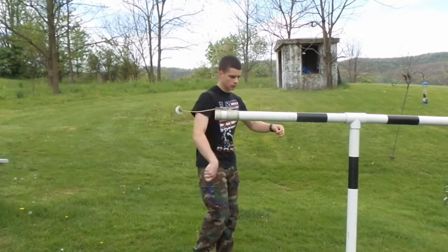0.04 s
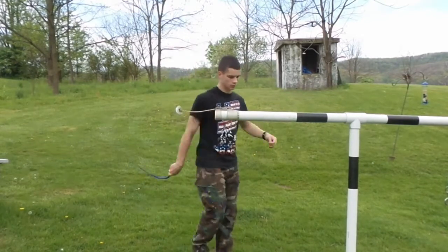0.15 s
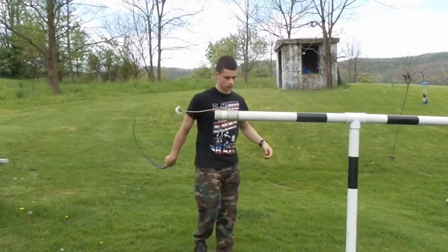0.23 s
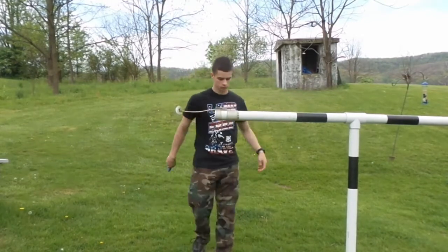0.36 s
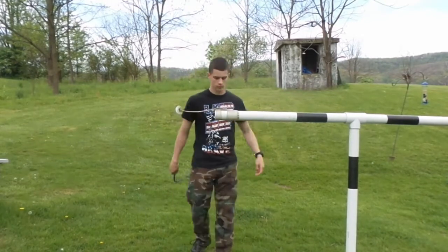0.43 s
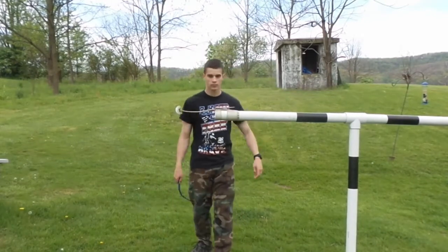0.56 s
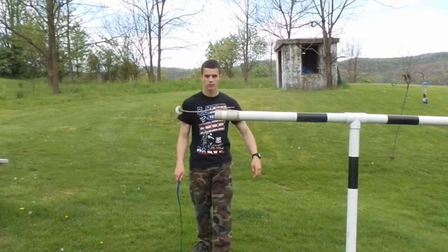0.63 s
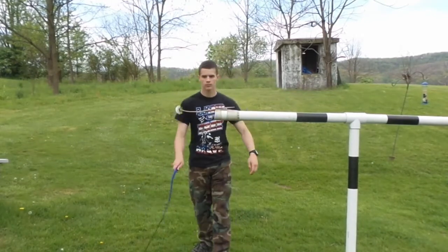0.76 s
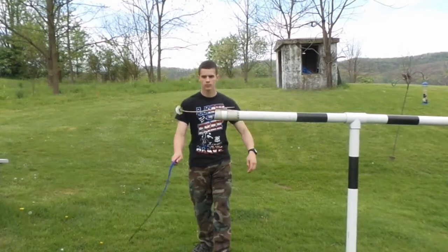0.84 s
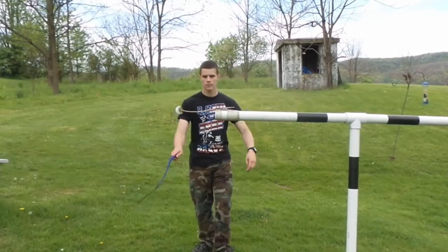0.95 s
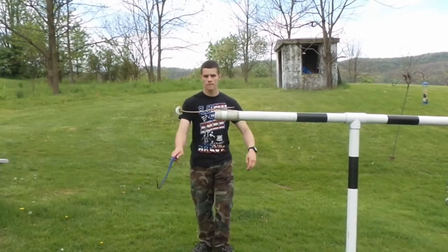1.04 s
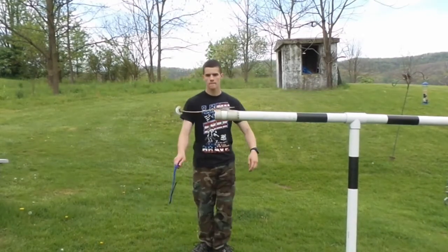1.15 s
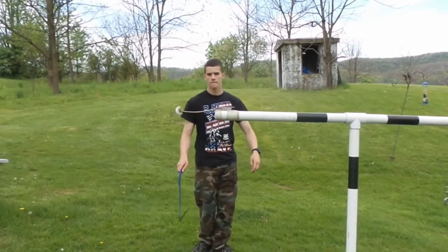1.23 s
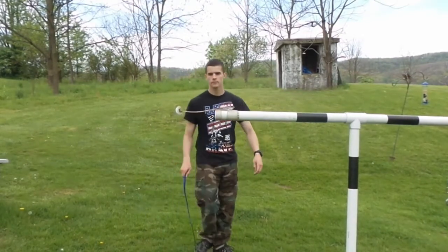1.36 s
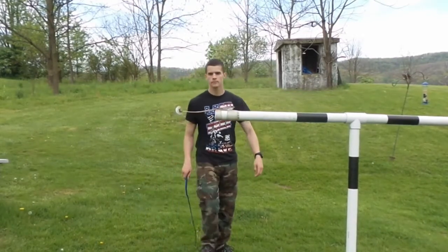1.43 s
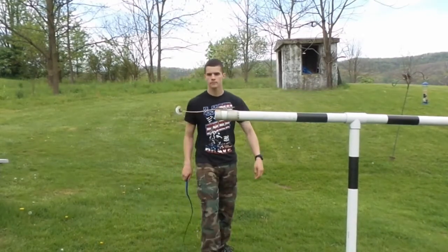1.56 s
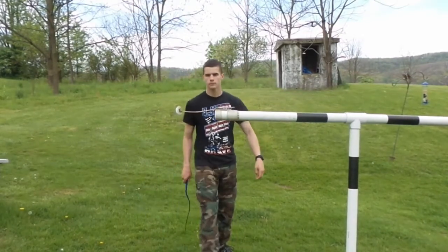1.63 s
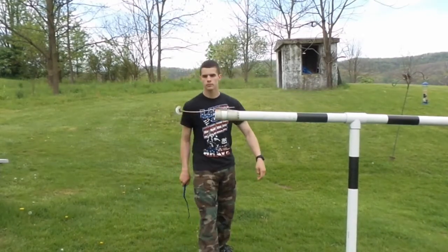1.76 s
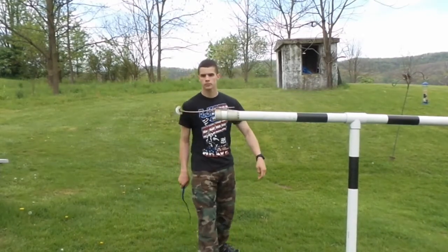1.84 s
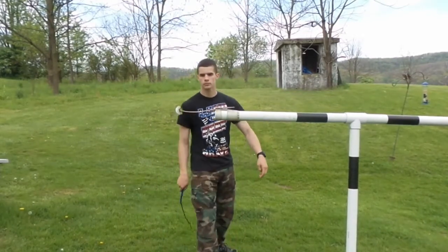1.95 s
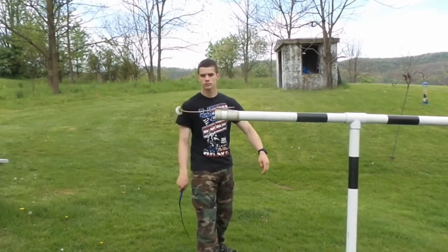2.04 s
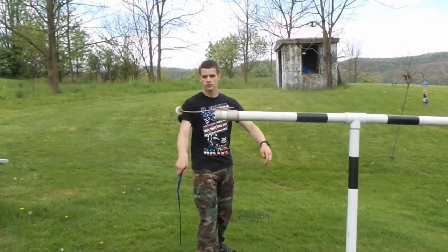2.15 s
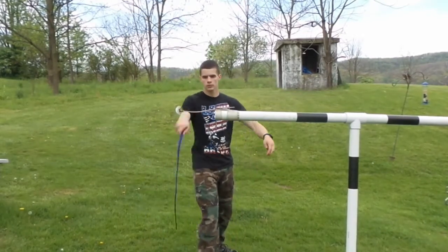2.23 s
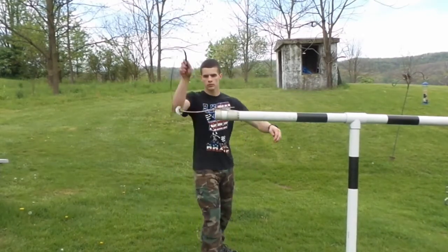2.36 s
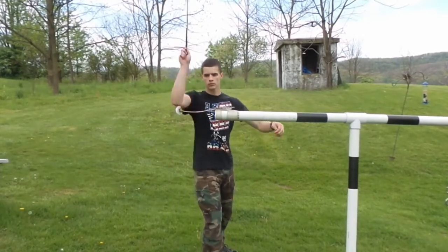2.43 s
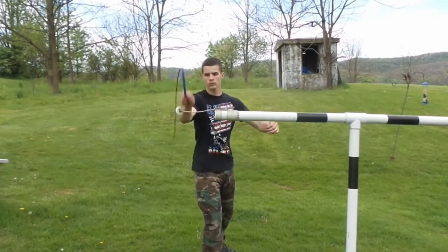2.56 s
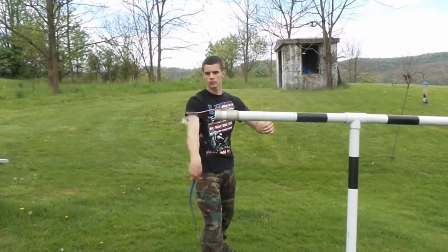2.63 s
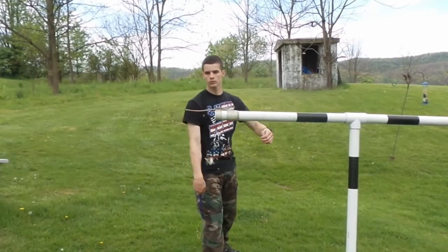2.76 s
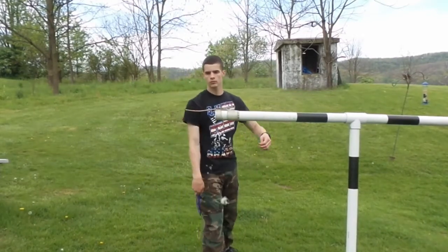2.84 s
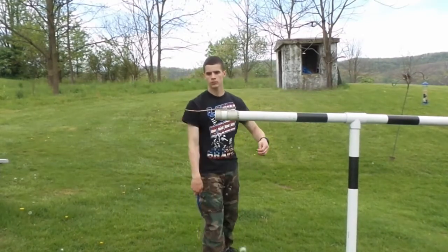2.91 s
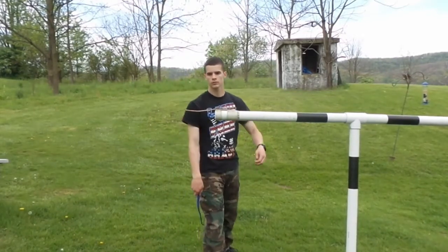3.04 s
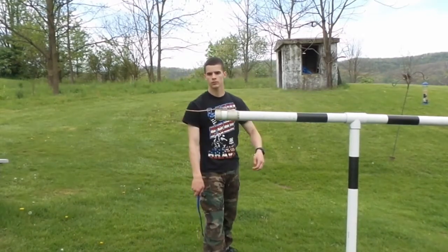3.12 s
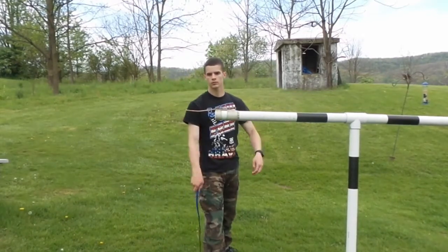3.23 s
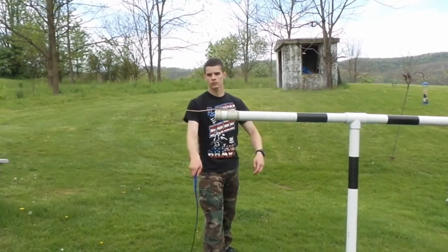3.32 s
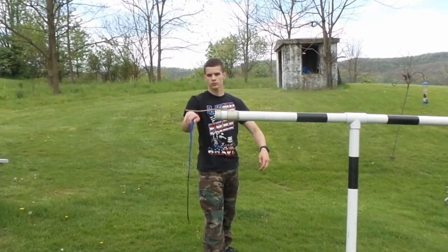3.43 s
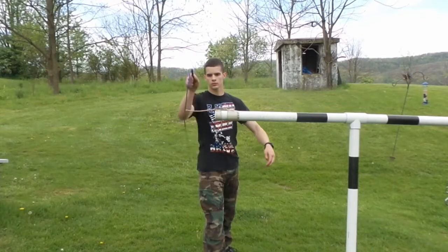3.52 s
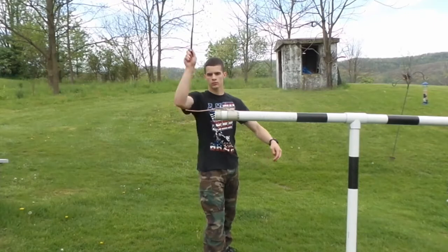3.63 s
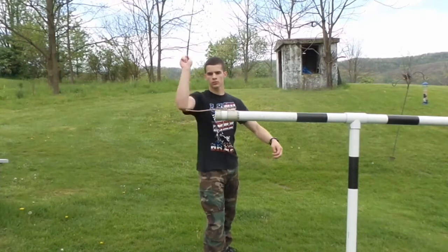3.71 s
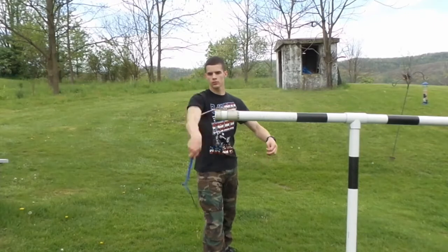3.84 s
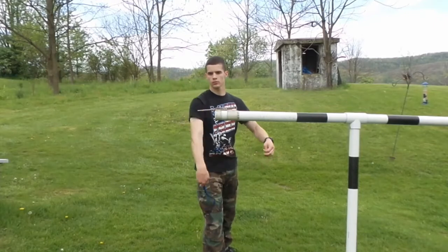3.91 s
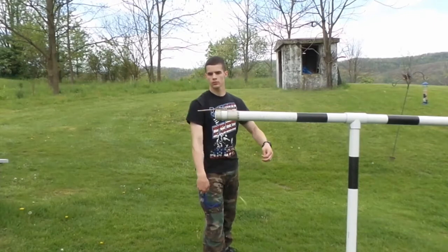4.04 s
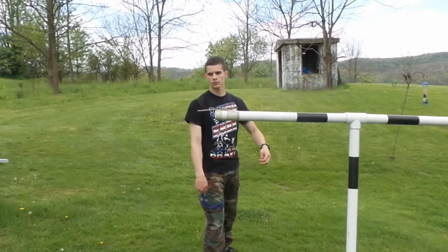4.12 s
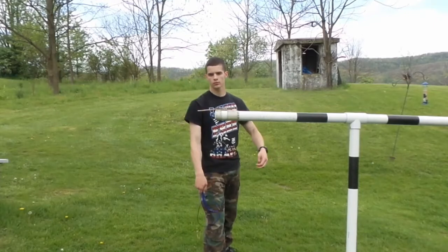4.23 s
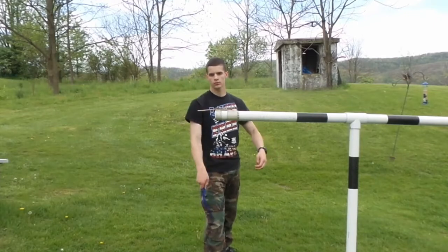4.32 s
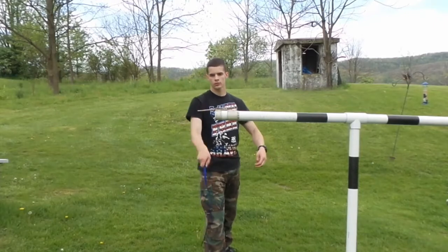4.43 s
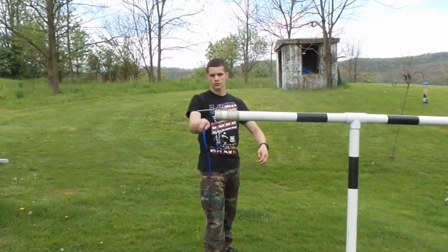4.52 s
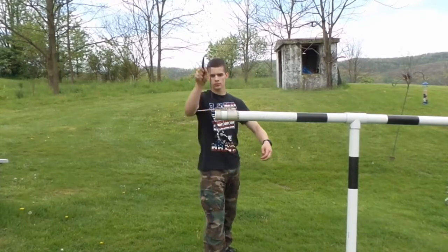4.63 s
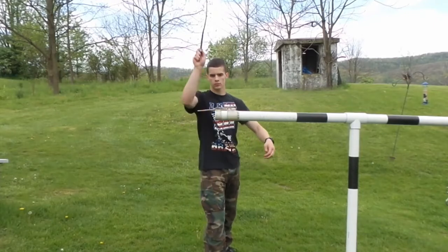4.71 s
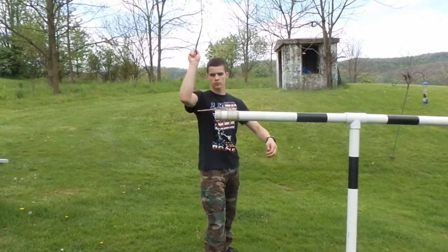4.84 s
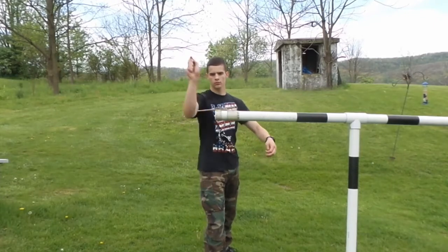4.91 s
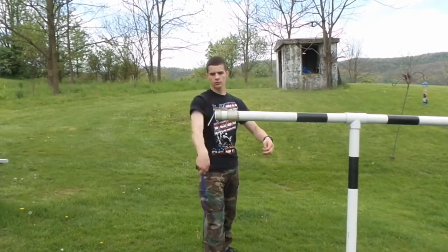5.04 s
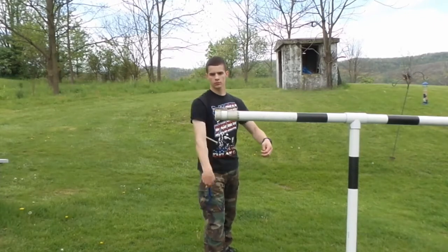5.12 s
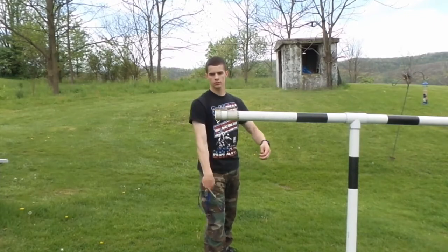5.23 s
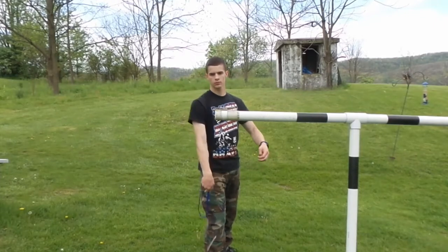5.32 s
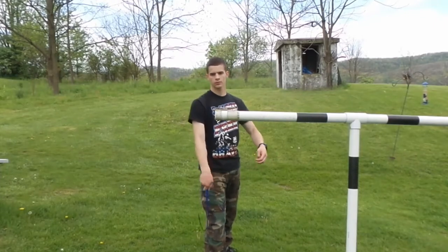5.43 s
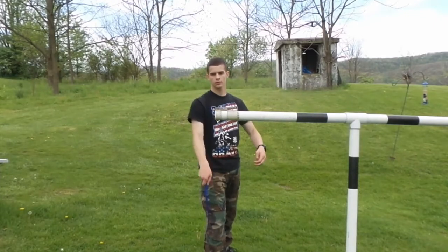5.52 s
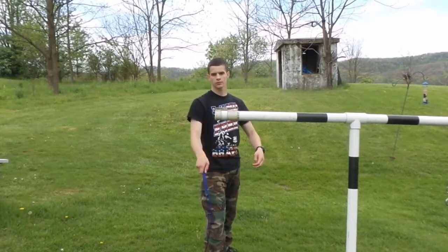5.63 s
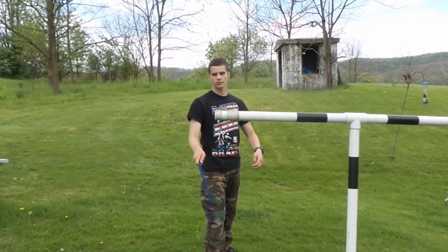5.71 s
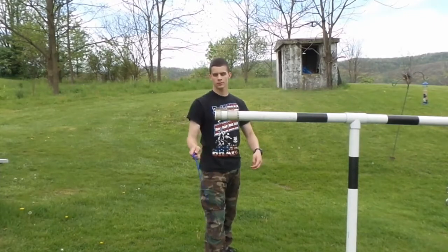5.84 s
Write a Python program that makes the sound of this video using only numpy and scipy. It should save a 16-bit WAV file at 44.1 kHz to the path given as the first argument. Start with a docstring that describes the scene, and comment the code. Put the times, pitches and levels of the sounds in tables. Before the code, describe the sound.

Four very loud, needle-sharp whip cracks in open air, heard by a nearby camera microphone that clips. The first comes immediately after a wavering whistle; the others arrive in the second half, evenly spaced, with short airy rushes before them. Each sprays crisp, hissing reflections from grass and a wall, dying within a fraction of a second. Between them there is near silence, a light breeze, muffled puffs and a few faint ticks.

```python
"""A whistling swish over a faint breeze leads to the first of four cracks of a small cord whip on a lawn.
Cord and tip shed vortices that whistle or rush; then the tip sends out a shock, an N-shaped pressure wave,
which overloads the microphone. Grass, near objects, a wall and a line of trees scatter delayed noise.
The breeze is coloured noise of varying strength; puffs of air thud on the microphone, and faint dry
ticks are noise bursts through a resonance."""
import sys
import numpy as np
from scipy import signal
from scipy.fft import rfft, irfft, next_fast_len
from scipy.io import wavfile
from scipy.ndimage import map_coordinates

SR = 44100
rng = np.random.default_rng(int(sys.argv[2]) if len(sys.argv) > 2 else 0)


def generate_wav(sig):
    """Save sig (samples, or channels by samples) to the path in sys.argv[1] as 16-bit PCM at SR."""
    pcm = np.round(np.clip(np.atleast_2d(sig).T, -1, 1) * 32767).astype(np.int16)
    wavfile.write(sys.argv[1], SR, pcm)


N = 258801

# The cracks: (time [s], shock level [dB], shock length [ms], treble ring level [dB], lawn echo level [dB],
# wall echo level [dB], wall decay t60 [s], trees' echo level [dB])
CRACKS = [(0.1946, -5.5, 0.12, -5.5, -20.5, -18.5, .15, -39), (2.762, 0.5, 0.166, -2, -24, -20, 0.22, -43),
          (4.0002, 2, 0.22, 2.8, -28, -22.5, 0.15, -49.5), (5.157, 2.8, 0.16, -0.2, -28, -22.5, .17, -48.5)]
# Colour of the lawn's echo: (frequency [Hz], relative density [dB per Hz])
LAWN_COLOUR = [(100, -38), (300, -22), (800, -8.5), (1600, -10), (4000, -7), (7000, -1.5), (12000, 0.5),
               (16000, -4.5)]
# Colour of the wall's echo: (frequency [Hz], relative density [dB per Hz])
WALL_COLOUR = [(100, -38.5), (300, -24), (700, -6), (1600, -6), (3500, -3), (6000, 0.5), (12500, 1),
               (16000, -4)]


def amp(db):
    """Level law: decibels to an amplitude factor, 20 dB to a factor of ten."""
    return 10 ** (np.asarray(db) / 20)


def unit(x):
    """Normalisation of power: x scaled to rms 1."""
    return x / np.sqrt(np.mean(x ** 2) + 1e-20)


def clock(origin_s=0):
    """Uniform sampling: the time [s] since the origin at every sample of the scene."""
    return np.arange(N) / SR - origin_s


def along(points, hz):
    """Logarithmic frequency scale: interpolates (frequency [Hz], value) points along it."""
    point_hz, values = np.transpose(points)
    return np.interp(np.log(hz + 1), np.log(point_hz + 1), values)


def curves(rows):
    """Piecewise linear variation: one curve over the scene for each column after the time."""
    times, *columns = np.transpose(rows)
    return [np.interp(clock(), times, column) for column in columns]


def fade(t, t60):
    """Exponential decay: 1 up to t = 0, then 60 dB down after each t60 [s]."""
    return np.exp(-np.log(1000) * np.maximum(t, 0) / t60)


def swell(t, rise, fall):
    """Exponential growth up to t = 0 and exponential decay after it, with time constants [s]."""
    return np.exp(np.minimum(t / rise, -t / fall))


def filtered(x, response):
    """Linear filtering: the spectrum of x times a response of frequency."""
    size = next_fast_len(len(x) + 8192)  # padded against wrap-around
    spectrum = rfft(x, size) * response(np.fft.rfftfreq(size, 1 / SR))
    return irfft(spectrum, size)[:len(x)]


def noise(colour, size=N):
    """Spectral shaping: white noise given a (frequency [Hz], density [dB per Hz]) colour, at rms 1."""
    return unit(filtered(rng.standard_normal(size), lambda hz: amp(along(colour, hz))))


def air(corner_hz, size, order=1):
    """Turbulence noise of rms 1: thin in the deep bass and falling above a corner."""
    def response(hz):
        bass_cut = hz / np.hypot(hz, 250)
        return bass_cut / np.hypot(hz / corner_hz, 1) ** order

    return unit(filtered(rng.standard_normal(size), response))


def wobble(rate):
    """Band-limited fluctuation: a smooth random curve with rate knots a second."""
    knots = rng.standard_normal(int(N * rate / SR) + 4)
    return map_coordinates(knots, [clock() * rate])


def ping(t, hz, t60):
    """Damped resonance: a decaying cosine that starts at full pressure."""
    return np.cos(2 * np.pi * hz * t) * fade(t, t60)


def n_wave(ms):
    """Weak-shock N-wave: pressure jumps up, falls through zero and jumps back."""
    samples = SR * ms / 1000
    u = (np.arange(SR // 100) - 1) / samples  # 0 at the front shock, 1 at the rear
    front = np.clip(u * samples + 1, 0, 1)
    rear = np.clip((1 - u) * samples + 1, 0, 1)
    return (1 - 2 * u) * front * rear / (1 + 1 / samples)


def crackle(colour, share):
    """Sparse scattering: a second of noise of rms 1, a share of its power as separate tiny echoes."""
    sparks = rng.standard_normal(SR) * (rng.random(SR) < 900 / SR)  # about 900 echoes a second
    share = np.clip(share, 0, 1)
    mix = np.sqrt(share) * unit(sparks) + np.sqrt(1 - share) * rng.standard_normal(SR)
    return unit(filtered(mix, lambda hz: amp(along(colour, hz))))


def slap(t60, corner_hz):
    """Diffuse reflection: a far echo blurred into a puff of noise."""
    t = np.arange(SR) / SR
    return (1 - fade(t, t60 / 4)) * fade(t, t60) * air(corner_hz, size=SR, order=2)


def whistle(pitch, top_db, db_per_octave, far_db, stop_t60, width_hz, spread):
    """Vortex shedding: a narrow noise, higher and louder with speed, loudest where the cord is nearest."""
    pass_s, half_s = .152, .02  # when the cord is nearest, and for how long
    hz, = curves(pitch)
    away = 1 - 1 / (1 + (clock(pass_s) / half_s) ** 2)
    db = top_db + db_per_octave * np.log2(hz / hz.max()) + far_db * away
    phase = 2 * np.pi * np.cumsum(hz * (1 + spread * wobble(rate=700))) / SR
    stop = fade(clock(pitch[-1][0]), stop_t60)
    return amp(db + 1.5 * wobble(width_hz)) * stop * unit(np.sin(phase))


def add(track, s, x):
    """Superposition: mixes x into the track from time s [s]."""
    start = max(round(s * SR), 0)
    part = x[:max(N - start, 0)]
    track[start:start + len(part)] += part


def breeze():
    """Turbulent flow: one strength drives both the hiss and the rumble of moving air."""
    # Strength of the breeze: (time [s], level [dB])
    strength = [(0, -65.5), (0.9, -78.5), (1.05, -76), (1.2, -70), (1.5, -69), (1.9, -65), (2.1, -67),
                (2.28, -72.5), (2.52, -69.5), (3.3, -78), (3.55, -76.5), (4.6, -77), (5.87, -76.5)]
    # Colour of the hiss: (frequency [Hz], relative density [dB per Hz])
    hiss_colour = [(150, -34.5), (250, -6), (367, -6.5), (421, -5.5), (460, -3.5), (3170, -14.5),
                   (12300, -19.5), (15200, -21.5), (16000, -28)]
    # Colour of the rumble: (frequency [Hz], relative density [dB per Hz])
    rumble_colour = [(12, -39), (20, -9.5), (22, -15.5), (60, 2), (151, -1.5), (226, -7.5), (500, -15),
                     (650, -38.5), (1100, -120)]
    hiss_db, rumble_db = 4, 6  # mean levels over the strength
    strength_db, = curves(strength)
    hiss = amp(hiss_db + 0.75 * wobble(rate=8.3)) * noise(hiss_colour)
    rumble = amp(rumble_db + 3.2 * wobble(rate=15)) * noise(rumble_colour)
    return amp(strength_db) * (hiss + rumble)


def thuds():
    """Flow pressure: a puff pushes and pulls on the microphone, amid weaker eddies."""
    # Puffs of air: (time [s], level [dB], frequency [Hz])
    puffs = [(1.294, -28, 111.5), (1.332, -41, 70), (1.663, -36, 65), (1.799, -40.5, 65), (1.835, -39, 130),
             (1.860, -31.5, 93), (2.017, -31, 65), (3.371, -50.5, 94.9), (3.961, -39.5, 108),
             (4.338, -48.5, 100.3), (4.445, -47, 90.6), (5.675, -48, 99)]
    # Colour of the eddies: (frequency [Hz], relative density [dB per Hz])
    eddy_colour = [(25, -19.5), (70, 1), (140, -4), (300, -26.5), (900, -69), (2000, -120)]
    half_cycles = 0.55  # half length of a puff
    eddy_db, eddy_s = -17, 0.034  # level under the puff, time constant
    out = np.zeros(N)
    t = np.arange(SR // 2) / SR - .25
    for s, db, hz in puffs:
        push = -np.sin(2 * np.pi * hz * t) * np.exp(-(hz * t / half_cycles) ** 2)
        eddies = amp(eddy_db) * swell(t, eddy_s, eddy_s) * noise(eddy_colour, size=len(t))
        add(out, s + t[0], amp(db) * (push + eddies))
    return out


def ticks():
    """Resonant filtering: faint dry ticks, each a short noise burst through one resonance."""
    # Ticks: (time [s], level [dB], centre frequency [Hz], relative width [1], decay t60 [s])
    tick_rows = [(.836, -57.5, 2300, .13, 0.02), (1.136, -53, 2280, .13, 0.022),
                 (1.332, -54, 5400, .5, 0.018), (1.578, -57, 10140, 0.69, 0.06)]
    out = np.zeros(N)
    t = np.arange(SR // 5) / SR - .02
    for s, db, centre_hz, width, t60 in tick_rows:
        burst = (t >= 0) * fade(t, t60)
        ring = filtered(burst * rng.standard_normal(len(t)),
                        lambda hz: 1 / (1 + ((hz / centre_hz - 1) / width) ** 4))
        # the ring gets the energy of the burst's envelope
        add(out, s + t[0], amp(db) * ring * np.linalg.norm(burst) / np.linalg.norm(ring))
    return out


def far_echoes():
    """Delayed reflection: a dull thump, stronger for a long shock up to a limit, then slaps off the trees."""
    # Slaps: (delay [s], level over the trees' echo [dB], decay t60 [s], corner frequency [Hz])
    slap_rows = [(.1225, -0.5, .027, 8000), (.175, -2, 0.037, 7000), (.425, -25, .4, 3600)]
    thump_delay_s, thump_db, thump_t60_s, thump_corner_hz = .092, -39, .045, 620
    full_shock_ms = .17  # a shorter shock has less bass
    out = np.zeros(N)
    for s, shock_db, ms, *_, trees_db in CRACKS:
        bass = amp(thump_db) * min(amp(shock_db) * (ms / full_shock_ms) ** 2, 1)
        add(out, s + thump_delay_s, bass * slap(thump_t60_s, thump_corner_hz))
        for delay, db, t60, corner_hz in slap_rows:
            add(out, s + delay, amp(trees_db + db) * slap(t60, corner_hz))
    return out


def scatter():
    """Diffuse scattering: the lawn sprays back sound at once, the wall follows, the trees answer last."""
    # Colour of the trees' echo: (frequency [Hz], relative density [dB per Hz])
    foliage_colour = [(100, -13.5), (400, -13), (1000, -5.5), (2500, -1.5), (5000, 0.5), (9000, 1),
                      (13000, -4.5), (16000, -18)]
    # Decay of the trees' echo: (frequency [Hz], decay t60 [s])
    trees_decay = [(200, 0.51), (1500, 0.5), (4500, 0.55), (9000, 0.37), (15000, 0.26)]
    trees_delay_s = 0.15
    out = np.zeros(N)
    t = np.arange(SR) / SR
    for s, _, _, _, lawn_db, wall_db, wall_t60, trees_db in CRACKS:
        lumps = amp(2 * wobble(rate=400)[:SR])
        lawn = amp(lawn_db) * np.minimum(t / 0.016, 1) ** 1.3 * fade(t - .034, .1)
        wall = amp(wall_db) * fade(.042 - t, 0.026) * fade(t - .042, wall_t60)
        lawn_spray = lawn * lumps * crackle(LAWN_COLOUR, share=.25)
        wall_spray = wall * np.sqrt(lumps) * crackle(WALL_COLOUR, share=0.099)
        add(out, s, lawn_spray + wall_spray)
        # air soaks up the treble on the long way back from the trees
        hz, late, bins = signal.stft(crackle(foliage_colour, share=0.11), SR, nperseg=256)
        decay = fade(late - trees_delay_s, along(trees_decay, hz)[:, None])
        tail = signal.istft(bins * decay, SR, nperseg=256)[1][:SR]
        onset = np.minimum(t / trees_delay_s, 1) ** 1.4
        add(out, s, amp(trees_db) * onset * amp(.8 * wobble(rate=150)[:SR]) * tail)
    return out


def sharp_echoes():
    """Diffraction: small near things return only treble, the wall a whole N-wave; each adds a short spray."""
    # Things nearby: (delay [s], level over the lawn echo [dB])
    near_things = [(.0102, 11), (.0172, 18), (.0234, 19), (.029, 13.5)]
    # Faces of the wall: (delay [s], level [dB])
    wall_faces = [(0.04, -3.5), (.0430, -4), (.0475, -12)]
    out = np.zeros(N)
    t = np.arange(SR // 100) / SR
    # bass bends round a small object
    glint = np.diff(ping(t, hz=9800, t60=0.00041), prepend=0) / np.sqrt(2)
    for s, _, _, _, lawn_db, *_ in CRACKS:
        for delay, db in near_things:
            spray = amp(-11.5) * fade(t, 0.0062) * noise(LAWN_COLOUR, size=len(t))
            add(out, s + delay, amp(lawn_db + db) * (glint + spray))
        for delay, db in wall_faces:
            spray = amp(-17) * fade(t, 0.0075) * noise(WALL_COLOUR, size=len(t))
            add(out, s + delay, amp(db) * (n_wave(ms=.08) + spray))
    return out


def first_swing():
    """Aeolian tone: the wide first swing makes the thick cord and the thin tip whistle with their speed."""
    # Pitch of the thick cord: (time [s], frequency [Hz])
    cord_pitch = [(0, 755), (.045, 680), (.09, 400), (.135, 740), (.145, 850), (.153, 1230), (.166, 980),
                  (.19, 780)]
    # Pitch of the thin tip: (time [s], frequency [Hz])
    tip_pitch = [(0, 2150), (.06, 1330), (.1, 1450), (.135, 2460), (.147, 2100), (.155, 3470), (.164, 4870)]
    cord = whistle(cord_pitch, top_db=-26, db_per_octave=20, far_db=-17,
                   stop_t60=.02, width_hz=230, spread=.16)
    tip = whistle(tip_pitch, top_db=-31.5, db_per_octave=16, far_db=-3,
                  stop_t60=0.011, width_hz=300, spread=.06)
    return cord + tip


def swishes():
    """Aerodynamic noise: the cord comes forward, its loop rushes past with a wake, the tip dashes."""
    # The throw before each crack: (loop level [dB], loop swell and fade time constant [s],
    # loop corner frequency [Hz], wake level [dB], whole cord level [dB])
    throws = [(-38, .013, 7000, -60, -53), (-40.5, .006, 1600, -50, -54), (-25, .002, 810, -44.5, -47),
              (-58, .004, 5000, -54, -54)]
    loop_lead_s = .0338  # the loop passes this long before the crack
    out = np.zeros(N)
    t = np.arange(SR // 2) / SR - .19
    size = len(t)
    for (s, *_), (loop_db, loop_s, loop_hz, wake_db, arm_db) in zip(CRACKS, throws):
        arm = amp(arm_db) * swell(t, rise=.026, fall=.02) * air(2200, size)
        loop = amp(loop_db) * swell(t + loop_lead_s, loop_s, loop_s) * air(loop_hz, size)
        wake = amp(wake_db) * swell(t + loop_lead_s, rise=.006, fall=.028) * air(3000, size)
        tip = amp(-35) * swell(t, rise=.0035, fall=0.0052) * air(2600, size)
        add(out, s + t[0], arm + loop + wake + tip)
    return out


def cracks():
    """Shock radiation: N-waves ring the microphone port, bounce dully off the ground and leave a slow swing."""
    # Treble modes of the microphone port: (frequency [Hz], relative level [dB], decay t60 [s])
    port_modes = [(10500, 0, .0009), (12500, 1.5, .0011)]
    # Overload swings of the microphone: (time [s], level [dB], frequency [Hz], decay t60 [s])
    overload_swings = [(2.76218, 3.6, 91, .033), (4.00039, -2, 460, .0022), (5.15719, -4.5, 111, .018)]
    # Colour of the shock's sizzle: (frequency [Hz], relative density [dB per Hz])
    sizzle_colour = [(100, -7.5), (800, -3.5), (3000, 1), (7000, -4.5), (12500, 2), (16000, -6.5)]
    second_delay_s, second_db, second_ms = .0003, -8, .048  # a second shock; level over the first
    out = np.zeros(N)
    t = np.arange(SR // 4) / SR
    port = sum(amp(db) * ping(t, hz, t60) for hz, db, t60 in port_modes)
    for s, db, ms, ring_db, *_ in CRACKS:
        add(out, s, amp(db) * n_wave(ms))
        add(out, s, amp(ring_db) * port)
        add(out, s + second_delay_s, amp(db + second_db) * n_wave(second_ms))
        add(out, s, amp(-19.0) * fade(t, 0.012) * noise(sizzle_colour, size=len(t)))
        add(out, s + 0.0048, amp(-17.5) * ping(t, hz=503, t60=.002))  # the ground's dull bounce
    for s, db, hz, t60 in overload_swings:
        add(out, s, amp(db) * np.cos(2 * np.pi * hz * t + np.pi / 6) * fade(t, t60))
    return out


def scene():
    """Superposition: all sources add, alike in both channels."""
    whip = first_swing() + swishes() + cracks()
    echoes = sharp_echoes() + scatter() + far_echoes()
    mono = whip + echoes + breeze() + thuds() + ticks()
    return np.array([mono, mono])


def record(dry):
    """Clipping and band limiting: the camera clips the shocks, dulls the very top and cuts steeply above it."""
    # Response of the microphone: (frequency [Hz], gain [dB])
    mic_response = [(6000, -0.5), (10000, -1), (13500, 1), (15000, -3.5), (16700, -15.5)]
    top_hz = 15900  # the steep cut is 6 dB down here

    def response(hz):
        return amp(along(mic_response, hz)) / (1 + (hz / top_hz) ** 90)

    clipped = np.clip(dry, -1.05, 1.05)
    return np.array([filtered(channel, response) for channel in clipped])


dry = scene()
out = record(dry)
generate_wav(out)
```